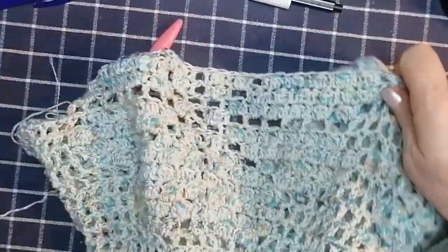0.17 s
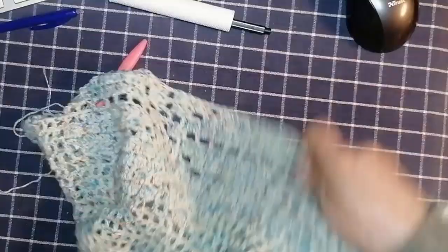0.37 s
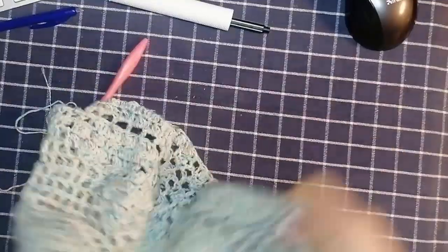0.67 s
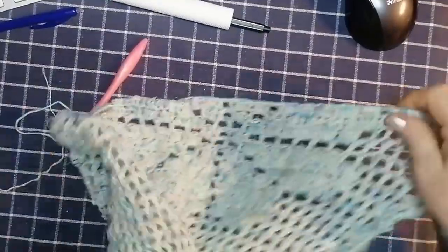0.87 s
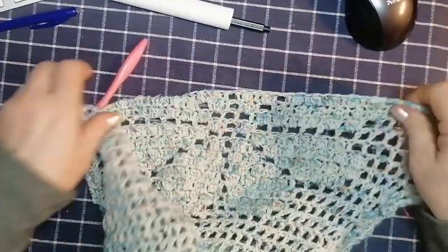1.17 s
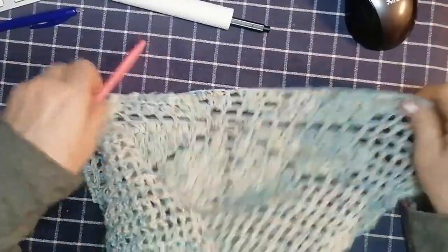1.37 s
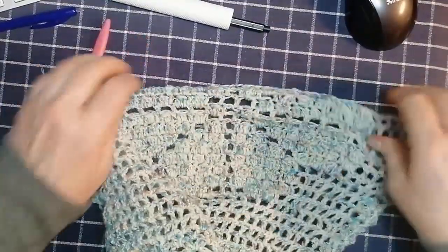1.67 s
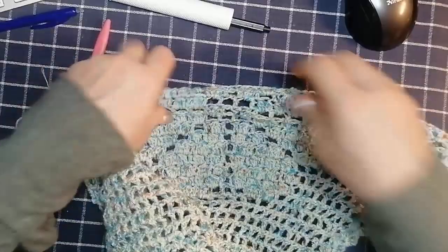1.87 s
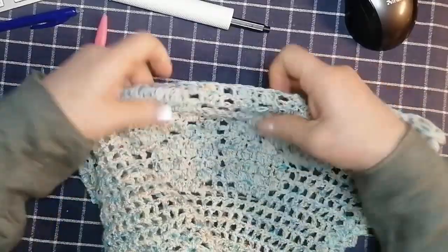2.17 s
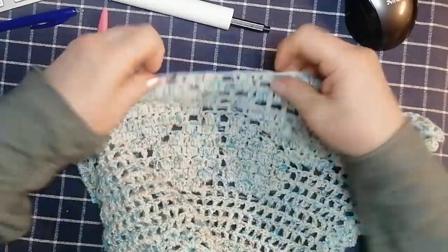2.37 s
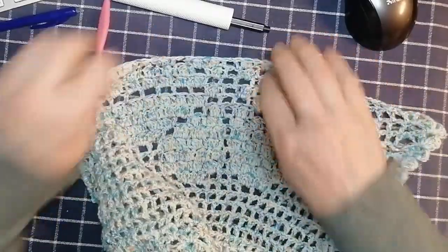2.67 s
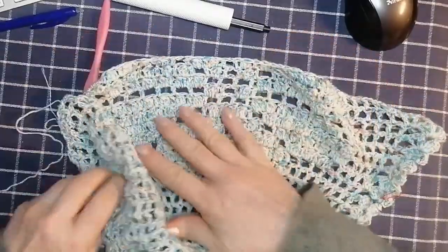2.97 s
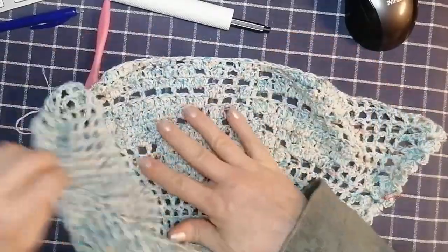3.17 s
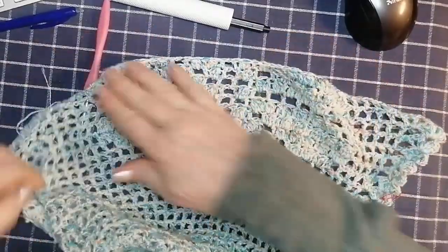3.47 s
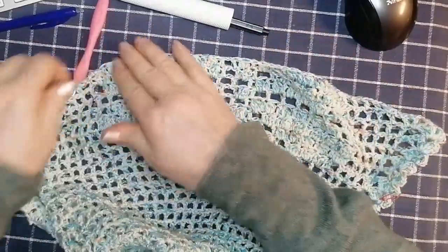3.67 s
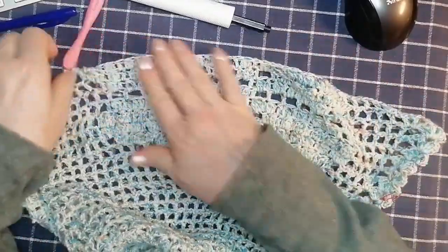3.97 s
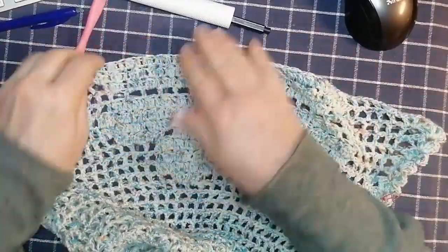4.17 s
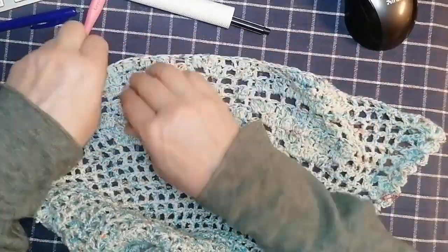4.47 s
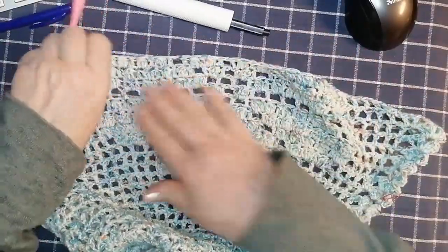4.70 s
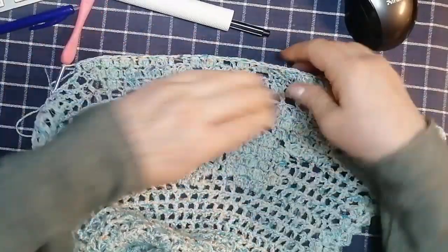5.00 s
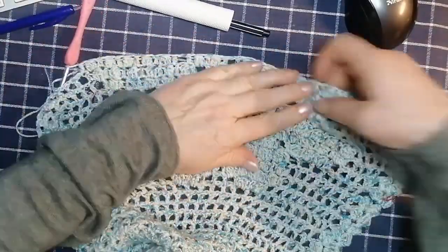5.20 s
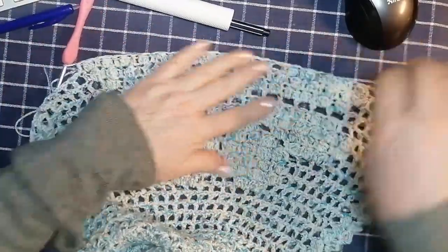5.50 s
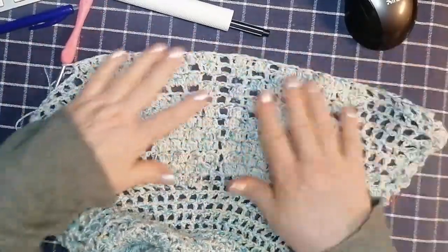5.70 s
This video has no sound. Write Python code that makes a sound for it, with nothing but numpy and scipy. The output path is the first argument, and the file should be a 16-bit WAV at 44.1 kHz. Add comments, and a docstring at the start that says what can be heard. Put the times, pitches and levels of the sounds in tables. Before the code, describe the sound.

Hands handle knotted cotton yarn on a mat-covered table, heard close up and fairly dry. Faint swishing opens; bumps and a brief scrape lead to one hard knock, then several heavy thumps around two seconds. After a lull come gentle rustles, muffled pats, a small plastic tick, a bright nail click and a few tiny skips, then two overlapping smoothing strokes.

```python
"""Hands spread and smooth a crocheted cotton piece on a table, close by in a small quiet room, in stereo.
Yarn and sleeves rustle: shaped noise with random snags, swelling and dying with each stroke.
Wrists and knuckles bump the table top, a bank of decaying modes; one hard rap rings resonances.
A plastic crochet hook scrapes along the mat as noise with a moving upper edge;
hook and fingernails click as pulses through resonances, and zip as gliding, uneven tones."""
import sys
import numpy as np
from scipy import signal
from scipy.fft import rfft, irfft, next_fast_len
from scipy.io import wavfile
from scipy.ndimage import uniform_filter1d, map_coordinates

SR = 44100
rng = np.random.default_rng(int(sys.argv[2]) if len(sys.argv) > 2 else 0)


def wrap_up_sound(samples):
    """Save the sound to the file named by the first command line argument, as 16-bit audio."""
    columns = np.atleast_2d(samples).T
    # keep every value between -1 and 1, then stretch to whole-number steps
    tamed = np.clip(columns, -1, 1)
    steps = np.round(tamed * 32767).astype(np.int16)
    wavfile.write(sys.argv[1], SR, steps)


N = 257632

# L-R dB: positive is louder on the left. Levels apply before the random level wobble.

# Quiet air. Each row: frequency in Hz, relative level in dB per Hz.
AIR_SPECTRUM = [(12, -37), (20, 4.5), (169, -9), (211, -11), (620, -18.5), (753, -17.5), (1080, -20.5),
                (1240, -20), (5380, -28), (12700, -38), (15000, -49)]
# Default stereo. Each row: frequency in Hz, left-right likeness from 0 to 1.
STEREO_LIKENESS = [(60, 0.46), (300, 0.66), (700, 0.34), (1400, 0.14), (3000, 0.073), (7000, 0.07),
                   (15000, .05)]

# Whole piece swept across the table. Each row: fastest moment in seconds, nominal half length in seconds,
# level in dB.
SWEEPS_TABLE = [(0, 0.095, -64.5), (0.327, 0.15, -69), (0.51, 0.064, -71), (0.757, 0.091, -74)]
# Sound of a sweep. Each row: frequency in Hz, relative level in dB per Hz.
SWISH_SPECTRUM = [(150, -33), (350, -4), (550, 4.5), (1100, 0.5), (1800, -7), (3000, -24), (8000, -37),
                  (15000, -57)]
FALL_OVER_RISE = 1.21  # a stroke dies more slowly than it swells

# Piece pulled or shifted. Each row: fastest moment in seconds, nominal half length in seconds,
# yarn level in dB, table rub over that level in dB; both before panning.
PULLS_TABLE = [(.01, 0.035, -70, 9.5), (0.179, 0.087, -70, 7), (0.402, 0.046, -71, 4),
               (0.505, 0.039, -70.5, 7.5), (0.668, 0.25, -79, 8.5), (1.229, 0.011, -72.5, -7),
               (1.454, 0.15, -73.5, 10), (2.052, 0.03, -71, 28.5), (2.15, 0.058, -77, 9),
               (2.565, 0.11, -84.5, 12.5), (3.093, 0.035, -69.5, 14), (3.326, 0.077, -72.5, 3),
               (3.691, 0.04, -68, 9.5), (4.064, 0.061, -67, 9.5), (4.353, 0.043, -75.5, 8.5),
               (4.489, 0.052, -78, 16), (4.76, 0.092, -76, 12.5), (5.292, 0.029, -68.5, 12),
               (5.492, 0.017, -78, 15.5)]
# Yarn hiss, sleeve brush, table rub. Each row: frequency in Hz, relative level in dB per Hz.
YARN_SPECTRUM = [(1500, -26.5), (4000, -8), (5500, 1.5), (7000, -1), (9500, -2.5), (11000, -9),
                 (13000, -20), (15000, -23)]
BRUSH_SPECTRUM = [(300, -7), (700, -2.5), (1200, 0), (1900, 1), (2700, 0.5), (4000, -2.5), (6000, -10),
                  (10000, -29)]
RUB_SPECTRUM = [(35, -14.5), (70, 10), (115, -0.5), (165, -0.5), (200, -11.5), (275, 7), (350, 1),
                (420, -10), (500, 1.5), (680, -16.5), (1000, -10.5), (2000, -38), (8000, -75.5)]
PULL_BRUSH_DB = 2  # sleeves over the yarn's hiss
DROPOUT_S = 0.449  # brief dropout in the cloth sound

# Table top modes. Each row: frequency in Hz, mean level in dB, undamped t60 in seconds.
TABLE_MODES = [(59, -20, 0.17), (99.4, -2.5, 0.24), (119.4, 5, 0.14), (155.1, -6, 0.15), (227.5, 0.5, 0.11),
               (277.8, 0.5, 0.14), (329.6, 1, 0.16), (377.4, -9.5, 0.058), (494.6, -1.5, 0.053),
               (510.3, 7.5, 0.0774), (564, -2, 0.029), (666, 0.5, 0.055), (835, 6, 0.079),
               (1020, -7.5, 0.046), (1210, -6.5, .05), (1308, -10, 0.0535), (1400, -11.5, 0.02),
               (1700, -10.5, .07), (2713, -25.5, 0.07)]
# Quickly damped modes. Each row: frequency in Hz, relative level in dB per Hz.
CROWD_SPECTRUM = [(30, -28.5), (70, -13.5), (140, -7.5), (195, -23), (260, -0.5), (350, -2), (420, -10),
                  (530, 2.5), (680, -5.5), (830, 0), (1100, -4), (1700, -0.5), (2050, -5.5), (2700, -3),
                  (5000, 2)]
# Their decay. Each row: frequency in Hz, t60 in seconds.
CROWD_DECAY = [(150, 0.11), (600, .06), (1500, 0.055), (2800, .07), (6000, .055)]
# Stereo of the damped modes. Each row: frequency in Hz, left-right likeness from 0 to 1.
BLOW_LIKENESS = [(100, .96), (500, .9), (1000, .55), (2000, .2), (4000, 0)]
# Knuckle or wrist knocks. Each row: start in seconds, level of the first 20 ms in dB, hardness in Hz, L-R in dB.
KNOCKS_TABLE = [(.105, -58, 171, -4), (0.189, -57.5, 261, 4), (.232, -62, 280, 2), (.308, -71, 444, 1),
                (.648, -65, 720, 3), (0.777, -63, 1110, 1), (1.423, -48.5, 400, 3.5), (1.56, -51.5, 330, 4),
                (1.578, -30.5, 444, 5.5), (1.5897, -27, 426, 0.5), (1.991, -62, 496, -6),
                (2.069, -32, 330, -0.5), (2.086, -29.5, 434, -2.5), (2.103, -37, 507, 0),
                (2.171, -34, 465, -1), (2.18, -42.5, 420, -2), (2.593, -56.5, 410, 0.5),
                (3.039, -52, 520, 4), (3.089, -51.5, 650, 4.5), (3.108, -60, 610, 10),
                (3.763, -63.5, 330, 4), (3.888, -52.5, 385, 3.5), (4.093, -56, 451, 8),
                (4.341, -49.5, 131, 6), (4.371, -38.5, 140, 3.5), (4.421, -54, 840, 2.5),
                (4.691, -58, 910, 6), (4.708, -53, 148, 1), (4.918, -57.5, 108, 1),
                (5.212, -59, 150.7, -2.5), (5.262, -58, 160, -5), (5.294, -55.5, 418, -1)]
# Hand landing, fingers then heel. Each row: start in seconds, finger level of the first 20 ms in dB,
# finger hardness in Hz, heel lag in seconds, heel over fingers in dB, L-R in dB.
LANDINGS_TABLE = [(1.25, -40, 484, 0.0094, 1.5, 3), (1.363, -42.5, 516, 0.051, -3.5, 3),
                  (1.923, -29.5, 445, 0.0051, 4.5, 2), (1.952, -33, 495, 0.0071, 2, 0),
                  (2.013, -24.5, 422, .018, 0.5, -4), (3.65, -61, 570, 0.025, 8, 3),
                  (3.832, -50, 444, 0.023, 4.5, 6.5), (4.024, -49, 522, 0.0185, 1, 2.5),
                  (4.508, -53, 447, 0.013, 7, 2.5), (4.776, -53.5, 477, 0.032, 7, 5),
                  (5.136, -47, 433, 0.0054, -3, -3)]
# Weights are the extra push on the low modes.
FINGER_WEIGHT_DB, HEEL_WEIGHT_DB, KNOCK_WEIGHT_DB = 2.5, 11, 5.5
HEEL_SOFTENS = 0.58  # heel hardness over the fingers'
HEEL_WEIGHT_DB_PER_DB, GENTLE_DB = 0.3, -46.5  # louder heels push more than a gentle one
BONE_HZ, LIGHTER_DB_PER_OCTAVE = 422, 10  # knocks harder than this push less on the low modes
CROWD_DB_PER_OCTAVE = 2.5  # a harder blow wakes more damped modes
RESTING_FROM_DB, RESTING_DAMPS = 2, 0.58  # heavier contacts rest on the table: share of ring time left

# Nail, cuff or hook tip zipping over weave or mat. Each row: start in seconds, length in seconds,
# first pitch in Hz, last pitch in Hz, level in dB, pitch unevenness from 0 to 1.
ZIPS_TABLE = [(0.302, 0.045, 320, 296, -51, 0.28), (0.361, .035, 295, 282, -63, 0.1),
              (.41, 0.14, 455, 496, -63.5, 0.04), (1.276, 0.08, 1906, 1275, -58.5, 0.13),
              (1.277, 0.06, 2910, 4360, -68.5, 0.11), (1.31, .17, 4355, 4050, -71, .08),
              (1.719, 0.041, 465.7, 554, -49, 0.16), (1.752, .045, 1100, 1455, -65.5, 0.15),
              (2.034, 0.036, 2390, 2414, -62.5, 0.03), (2.431, 0.28, 2430, 3165, -77.5, 0.1),
              (3.556, 0.1, 3670, 3600, -78.5, 0.07), (3.646, 0.023, 3640, 3580, -71.5, 0.01),
              (4.428, 0.046, 4170, 3830, -67.5, 0.05), (5.134, 0.021, 375, 320, -43.5, 0.04)]
ZIP_CATCH_DB = 4  # a zip catches and lets go

# Fingernails click and skip. Each row: start in seconds, level of the first 10 ms in dB, hardness in Hz,
# direct scrape's t60 in seconds, L-R in dB.
CLICKS_TABLE = [(1.225, -73, 12000, 0.036, 3.5), (1.313, -66, 14000, 0.065, 2),
                (2.015, -67, 13000, 0.027, -3), (2.053, -62.5, 9000, 0.05, 0), (2.083, -60, 1400, 0.025, 8),
                (2.093, -64, 1690, 0.021, 4), (2.248, -68, 1200, 0.02, 1), (3.651, -62, 2600, 0.04, 1),
                (4.436, -64.5, 5010, 0.056, 1.5), (4.488, -65.5, 9060, 0.041, -5),
                (4.6922, -38.5, 12950, 0.028, 4), (4.776, -54, 16000, 0.063, 1.5),
                (4.9003, -55.5, 10020, 0.015, 2), (4.9026, -55.5, 9900, 0.024, 8),
                (4.9215, -56.5, 7050, 0.036, 2), (4.9305, -59, 6500, 0.026, 7),
                (4.9392, -65, 6060, 0.022, 11), (4.9465, -59.5, 6500, 0.029, -3),
                (4.9585, -66, 6960, 0.015, 3)]
# Resonances of the hook as fingernails click on it. Each row: frequency in Hz, width in Hz, level in dB.
CLICK_BODY = [(1000, 290, -17), (2502, 750, -17.5), (4040, 200, -13.5), (4930, 360, -9), (5850, 400, -0.5),
              (6670, 450, -8), (8070, 350, -9), (9480, 460, -6), (10640, 490, -7.5), (12500, 1300, -14)]
ECHO_S, ECHO_LONGER = 0.0053, 1.3  # an early reflection, more drawn out than the scrape
WEAK_BELOW_HZ = 130  # a hard contact radiates little bass
LEFT_LEADS_S = 0.00012  # the pulse reaches the left port first

# Things dragged along the mat. Each row: start in seconds, length in seconds, level in dB,
# upper edge at full speed in Hz, time to full speed in seconds, share of the length at which it is loudest.
DRAGS_TABLE = [(1.248, 0.025, -52.5, 5440, 0.028, 0.35), (1.264, 0.39, -58, 5500, 0.075, 0.19),
               (1.738, 0.11, -54.5, 1410, 0.041, 0.17), (3.052, 0.11, -65.5, 1273, .04, 0.22)]
# Sound of the mat. Each row: frequency in Hz, relative level in dB per Hz.
MAT_SPECTRUM = [(400, -14), (800, -1), (1250, -1.5), (1480, 0), (1750, -4.5), (2200, -1), (2600, -23),
                (3400, -16.5), (3900, -4.5), (4800, -10.5), (6000, -14), (10000, -32.5), (15000, -50)]
START_SPEED = 0.37  # share of full speed at the start
DRAG_RUB_DB = 5.5  # table rumble over the scrape

# Hard rap on the table. Each row: start in seconds, level of the first 10 ms in dB, hardness in Hz,
# direct scrape's t60 in seconds, L-R in dB.
RAPS_TABLE = [(1.5892, -17, 6975, 0.04, 1)]
# Clack resonances. Each row: frequency in Hz, width in Hz, level in dB.
CLACK_BODY = [(290, 60, -3), (505, 63, 3.5), (705, 50, -5.5), (855, 70, -3.5), (1060.3, 130, -10.5),
              (1331, 140, -12), (1565, 170, -15.5), (1840, 50, -22.5), (2080, 120, -26.5), (2700, 450, -30),
              (4200, 1200, -46), (8500, 3000, -59)]

# Hook touches, then taps the mat. Each row: start in seconds, level of the first 10 ms in dB, hardness in Hz,
# direct scrape's t60 in seconds, L-R in dB.
TAPS_TABLE = [(3.7613, -53, 2400, 0.013, 7.5), (3.764, -41.5, 13000, 0.022, -1.5)]
# Hook resonances. Each row: frequency in Hz, width in Hz, level in dB.
HOOK_BODY = [(1430, 130, -16), (1840, 150, -7.5), (2710, 300, -8), (3130, 73, 4.5), (3500, 160, -10),
             (4960, 1400, -14), (6520, 490, -7), (8850, 770, -15.5), (11000, 1100, -21)]

# Flat palms smoothing outwards. Each row: fastest moment in seconds, nominal half length in seconds,
# level in dB before panning.
SMOOTHING_TABLE = [(5.535, 0.16, -61.5), (5.677, 0.17, -60.5)]
# Sound of the palms. Each row: frequency in Hz, relative level in dB per Hz.
PALM_SPECTRUM = [(50, -14), (150, -0.5), (330, 6.5), (510, 8), (660, -0.5), (950, -3.5), (1300, 0),
                 (2000, 0), (2800, 4), (4000, -4), (6000, -10), (10000, -31)]
# Stereo of the palms. Each row: frequency in Hz, left-right likeness from 0 to 1.
PALM_LIKENESS = [(100, .7), (500, 0.78), (1300, .45), (3000, .45), (8000, 0.092)]
PALM_HISS_DB, HISS_LAG_S = -4, 0.067  # the yarn hisses once the palm has got going

# Room decay. Each row: frequency in Hz, t60 in seconds.
ROOM_DECAY = [(100, .2), (400, .18), (1500, .16), (5000, .18), (12000, .14)]
TOP_HZ = 15100


def amp(db):
    """Decibels to gain."""
    return 10 ** (np.asarray(db) / 20)


def unit(x):
    """Scale to rms 1."""
    return x / np.sqrt(np.mean(x ** 2) + 1e-20)


def along(points, hz):
    """Interpolate (Hz, value) points on a log frequency axis."""
    point_hz, value = np.transpose(points)
    return np.interp(np.log(hz + 1), np.log(point_hz + 1), value)


def wobble(knots_per_s):
    """Smooth random curve through normally distributed knots."""
    knots = rng.standard_normal(int(N * knots_per_s / SR) + 4)
    return map_coordinates(knots, [np.arange(N) * knots_per_s / SR])


def fade(t, t60_s):
    """Free decay, 60 dB down after t60_s."""
    return np.exp(-np.log(1000) * t / t60_s)


def add(track, start_s, sound):
    """Mix a sound into a track from start_s, cut at the track's end."""
    part = track[..., round(start_s * SR):][..., :sound.shape[-1]]
    part += sound[..., :part.shape[-1]]


def panned(pan_db):
    """Left and right gains for a level difference."""
    return amp(np.array([[pan_db], [-pan_db]]) / 2)


def filtered(x, response):
    """Multiply the spectrum of x by a response of frequency."""
    n = x.shape[-1]
    size = next_fast_len(n + 8192)
    return irfft(rfft(x, size) * response(np.fft.rfftfreq(size, 1 / SR)), size)[..., :n]


def spread(pair, gain, alike=STEREO_LIKENESS):
    """Colour two unrelated signals and blend them to the left-right likeness at each frequency; rms 1."""
    def weights(hz):
        angle = np.arccos(np.clip(along(alike, hz), -1, 1)) / 2
        return gain(hz) * np.array([np.cos(angle), np.sin(angle)])
    mid, side = filtered(pair, weights)
    return unit(np.array([mid + side, mid - side]))


def dying(x, t60_points):
    """Let each frequency of x fade at its own speed."""
    hz, t, bins = signal.stft(x, SR, nperseg=256)
    faded = bins * fade(t, along(t60_points, hz)[:, None])
    return signal.istft(faded, SR, nperseg=256)[1][:, :x.shape[-1]]


def friction(spectrum, rate, size_db, grain):
    """Countless tiny slips merge into a hiss; about rate stronger snags a second stand out of it."""
    snag_size = amp(size_db * np.minimum(rng.exponential(size=N), 4))
    snags = (rng.random(N) < rate / SR) * snag_size
    slips = rng.standard_normal((2, N)) + grain * unit(snags * rng.standard_normal((2, N)))
    return spread(slips, lambda hz: amp(along(spectrum, hz)))


def stroke(fastest_s, half_s):
    """Power of one hand movement, swelling to its fastest moment and dying again."""
    t = np.arange(N) / SR - fastest_s
    width_s = half_s * FALL_OVER_RISE ** (np.sign(t) / 2)
    return np.exp(-np.minimum((t / width_s) ** 2, 20))


def strokes_level(rows, lag_s=0):
    """Level curve of several strokes, summed in power."""
    return np.sqrt(sum(amp(db) ** 2 * stroke(s + lag_s, half_s) for s, half_s, db in rows))


def still_air():
    """Steady shaped noise of the quiet room."""
    return amp(-68.0) * spread(rng.standard_normal((2, N)), lambda hz: amp(along(AIR_SPECTRUM, hz)))


def sweep():
    """The loose piece swishes over the mat, unevenly, as its rows of stitches catch."""
    swish = friction(SWISH_SPECTRUM, rate=150, size_db=5.5, grain=0.47)
    return strokes_level(SWEEPS_TABLE) * amp(0.9 * wobble(28)) * swish


def cloth():
    """In each stroke fibres hiss, sleeves brush, and the stitches drum faintly on the table."""
    t, power = np.arange(N) / SR, np.zeros((3, N))
    for s, half_s, db, rub_db in PULLS_TABLE:
        levels_db = [[db], [db + PULL_BRUSH_DB], [db + rub_db]]
        power += amp(levels_db) ** 2 * stroke(s, half_s)
    dropout = 1 - np.exp(-((t - DROPOUT_S) / 0.009) ** 4)
    hiss, brush, rub = np.sqrt(power) * dropout
    grip = wobble(35)  # the pressure changes from stitch to stitch
    hiss = hiss * amp(0.53 * grip) * friction(YARN_SPECTRUM, rate=370, size_db=2.5, grain=0.47)
    brush = brush * amp(1.2 * grip) * friction(BRUSH_SPECTRUM, rate=280, size_db=4.0, grain=0.45)
    rub = rub * amp(2.0 * grip) * friction(RUB_SPECTRUM, rate=94, size_db=-3.0, grain=0.55)
    return hiss * amp([[1.2], [0.1]]) + brush * amp([[0.1], [0.6]]) + rub * amp([[0.8], [-0.6]])


def contacts():
    """Every touch of the table as (s, dB, hardness Hz, weight dB, L-R dB)."""
    for s, db, hard_hz, lag_s, heel_over_db, pan_db in LANDINGS_TABLE:
        yield s, db, hard_hz, FINGER_WEIGHT_DB, pan_db
        heel_db = db + heel_over_db
        weight_db = HEEL_WEIGHT_DB + HEEL_WEIGHT_DB_PER_DB * (heel_db - GENTLE_DB)
        yield s + lag_s, heel_db, hard_hz * HEEL_SOFTENS, weight_db, pan_db
    for s, db, hard_hz, pan_db in KNOCKS_TABLE:
        octaves = max(np.log2(hard_hz / BONE_HZ), 0)
        yield s, db, hard_hz, KNOCK_WEIGHT_DB - LIGHTER_DB_PER_OCTAVE * octaves, pan_db


def contact_gain(hz, hard_hz, weight_db):
    """Soft flesh reaches mainly the low modes, bone the high ones too."""
    push = amp(weight_db / (1 + (hz / 200) ** 4))
    body = 1 / np.sqrt(1 + (1.095 * hz / hard_hz) ** 12)
    skirt = 0.035 / (1 + (hz / hard_hz) ** 1.32) / (1 + (hz / 5500) ** 4)
    return push * (body + skirt)


def bumps():
    """Each blow rings the table's main modes and a crowd of quickly damped ones between them."""
    out, t = np.zeros((2, N)), np.arange(SR // 3) / SR
    first = slice(SR // 50)
    hz, level_db, t60_s = np.transpose(TABLE_MODES)[:, :, None]
    highpass = signal.butter(N=2, Wn=88, btype="high", fs=SR, output="sos")
    for s, db, hard_hz, weight_db, pan_db in contacts():
        gain = lambda f: contact_gain(f, hard_hz, weight_db)
        strength, offset = rng.standard_normal((2, len(TABLE_MODES), 1))
        # short waves reach the two ports out of step
        phase = np.minimum((hz / 1300) ** 2, 0.9) * (np.sign(offset) + offset / 2)
        swing = np.sin(2 * np.pi * hz * t + np.array([1, -1])[:, None, None] * phase)
        damping = RESTING_DAMPS if weight_db > RESTING_FROM_DB else 1
        mode_gain = amp(level_db + 1.3 * strength) * gain(hz)
        ring = np.sum(mode_gain * fade(t, t60_s * damping) * swing, axis=1)
        noise = rng.standard_normal((2, len(t)))
        crowd = spread(noise, lambda f: gain(f) * amp(along(CROWD_SPECTRUM, f)), BLOW_LIKENESS)
        crowd = dying(crowd, CROWD_DECAY)
        crowd_db = CROWD_DB_PER_OCTAVE * max(np.log2(hard_hz / BONE_HZ), 0)
        onset = 1 - np.exp(-(t * hard_hz / 0.75) ** 2)
        blow = (ring / np.std(ring[:, first]) + amp(crowd_db) * crowd) * onset
        # the slowest flexing of the board radiates little sound
        blow = signal.sosfilt(highpass, blow)
        add(out, s, amp(db) * panned(pan_db) * blow / np.std(blow[:, first]))
    return out


def zips():
    """Threads pass at an uneven rate, so the pitch is a fuzzy line that glides with the speed."""
    out = np.zeros((2, N))
    for s, length_s, first_hz, last_hz, db, rough in ZIPS_TABLE:
        u = np.linspace(0, 1, int(length_s * SR))
        uneven = unit(uniform_filter1d(rng.standard_normal((2, len(u))), size=40, axis=1))
        pitch_hz = (first_hz + (last_hz - first_hz) * u) * (1 + rough * uneven)
        catching = amp(ZIP_CATCH_DB * wobble(90)[:len(u)])
        tone = unit(catching * np.sin(2 * np.pi * np.cumsum(pitch_hz, axis=1) / SR))
        add(out, s, amp(db) * np.sin(np.pi * u ** 0.67) * tone)
    return out


def causal(gain, size=8192):
    """Minimum-phase impulse response: has this gain curve and starts at once."""
    cepstrum = irfft(np.log(gain(np.fft.rfftfreq(size, 1 / SR)) + 1e-6))
    cepstrum[1:size // 2] *= 2
    cepstrum[size // 2 + 1:] = 0
    return irfft(np.exp(rfft(cepstrum)))


def struck(hits, body, scatter_db, echo_db):
    """Each hard contact is a sharp pulse, a brief scatter and an early reflection, shaped by the resonances."""
    out, t = np.zeros((2, N)), np.arange(SR // 6) / SR

    def resonances(f):
        return np.sqrt(sum((amp(db) / (1 + ((f - hz) / width_hz) ** 2)) ** 2 for hz, width_hz, db in body))

    def noise_burst(t60_s, db):
        noise = rng.standard_normal((2, len(t))) * fade(t, t60_s)
        return amp(db) * noise / np.linalg.norm(noise[0])

    for s, db, hard_hz, t60_s, pan_db in hits:
        force = noise_burst(t60_s, scatter_db)
        force[0, 0] += 1
        force[1, round(LEFT_LEADS_S * SR)] += 1
        add(force, ECHO_S, noise_burst(t60_s * ECHO_LONGER, echo_db))

        def gain(f):
            rolloff = (1 + (f / hard_hz) ** 6) * (1 + (WEAK_BELOW_HZ / (f + 1)) ** 4)
            return resonances(f) / np.sqrt(rolloff)
        hit = signal.fftconvolve(force, causal(gain)[None], axes=1)
        add(out, s, amp(db) * panned(pan_db) * hit / np.std(hit[:, :SR // 100]))
    return out


def nail_clicks():
    """Fingernails click and skip on the hook, ringing its resonances."""
    return struck(CLICKS_TABLE, CLICK_BODY, scatter_db=3.5, echo_db=-5.5)


def slide():
    """Hook and fingers scrape the mat in small slips, brighter as they speed up; the table rumbles under them."""
    now, level, edge_hz = np.arange(N) / SR, np.zeros(N), np.ones(N)
    for s, length_s, db, top_hz, speed_up_s, peak in DRAGS_TABLE:
        u = np.clip((now - s) / length_s, 0, 1)
        warp = np.log(0.5) / np.log(peak)  # puts the maximum at peak
        level += amp(db) * np.sin(np.pi * u ** warp) ** 2
        speed = np.interp(now - s, [0, speed_up_s], [START_SPEED, 1])
        edge_hz = np.where(now > s - 256 / SR, top_hz * speed, edge_hz)  # one frame early
    scrape = friction(MAT_SPECTRUM, rate=660, size_db=1.5, grain=0.88)
    hz, t, bins = signal.stft(scrape, SR, nperseg=256)
    lowpass = 1 / np.sqrt(1 + (hz[:, None] / np.interp(t, now, edge_hz)) ** 10)
    rasp = signal.istft(bins * lowpass, SR, nperseg=256)[1][:, :N]
    rumble = amp(DRAG_RUB_DB) * friction(RUB_SPECTRUM, rate=90, size_db=-0.5, grain=0.31)
    return level * amp(1.9 * wobble(60)) * (rasp + rumble) * panned(1.9)


def rap():
    """Something hard raps the table: a hollow clack that dies at once."""
    return struck(RAPS_TABLE, CLACK_BODY, scatter_db=-5.0, echo_db=-13.0)


def hook_taps():
    """The hook is set down on the mat, ringing its own resonances."""
    return struck(TAPS_TABLE, HOOK_BODY, scatter_db=1.0, echo_db=-9.5)


def palms():
    """Flat palms glide evenly over many stitches at once: a smooth swish, then the hiss of the yarn."""
    swish = spread(rng.standard_normal((2, N)), lambda hz: amp(along(PALM_SPECTRUM, hz)), PALM_LIKENESS)
    swish = strokes_level(SMOOTHING_TABLE) * amp(0.42 * wobble(20)) * swish
    hiss = amp(PALM_HISS_DB) * friction(YARN_SPECTRUM, rate=900, size_db=-2.0, grain=0.3)
    hiss = strokes_level(SMOOTHING_TABLE, HISS_LAG_S) * hiss
    return swish * panned(-0.6) + hiss * panned(1.6)


def room(x):
    """The near walls answer after 5 ms with a short tail that fades at its own speed in each band."""
    tail = dying(spread(rng.standard_normal((2, SR // 2)), np.ones_like), ROOM_DECAY)
    tail = np.pad(tail / np.linalg.norm(tail[0]), ((0, 0), (SR // 200, 0)))
    return signal.fftconvolve(x, tail, axes=1)[:, :N]


def scene():
    """Cloth, table and hook over the still air; only blows, clicks and zips feed the room tail."""
    thuds, clack = bumps(), rap()
    ticks = nail_clicks() + hook_taps() + zips()
    tail = room(amp(-13.5) * thuds + amp(-11.0) * clack + amp(-11.5) * ticks)
    rustle = sweep() + cloth() + palms()
    return rustle + slide() + thuds + clack + ticks + tail + still_air()


def record(dry):
    """Steep band limit at TOP_HZ."""
    return filtered(dry, lambda hz: 1 / np.sqrt(1 + (hz / TOP_HZ) ** 160))


dry = scene()
out = record(dry)
wrap_up_sound(out)
```